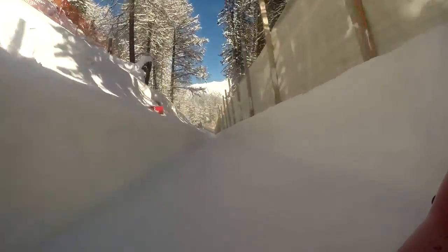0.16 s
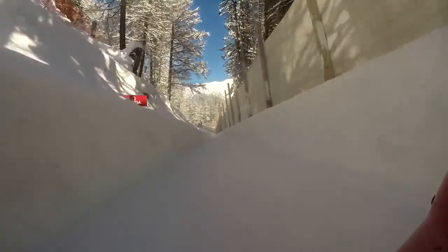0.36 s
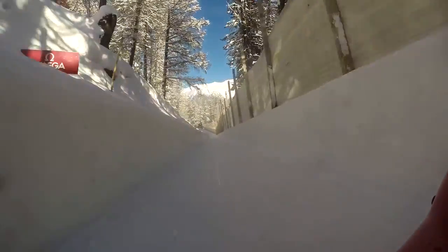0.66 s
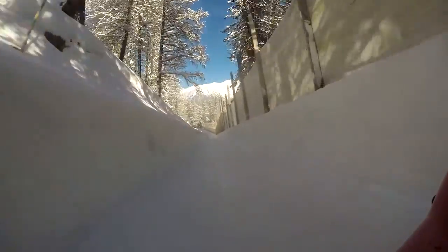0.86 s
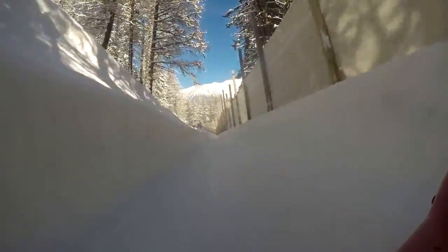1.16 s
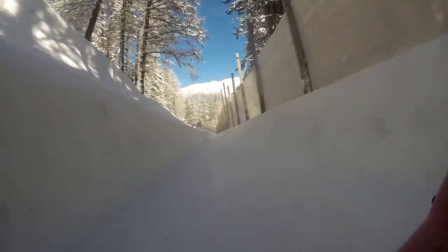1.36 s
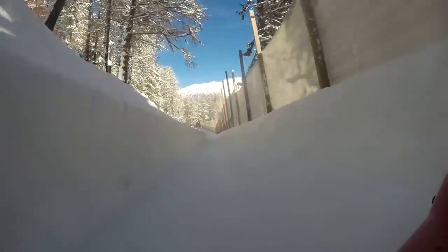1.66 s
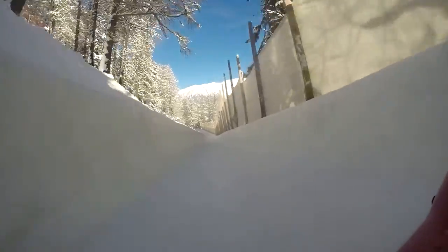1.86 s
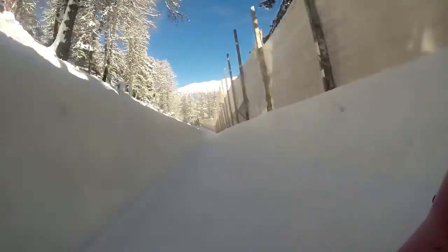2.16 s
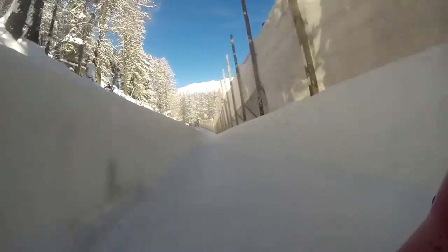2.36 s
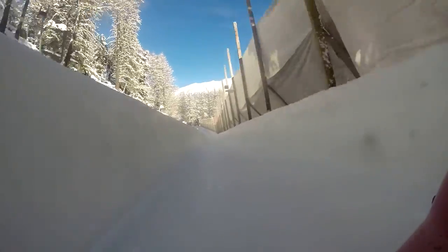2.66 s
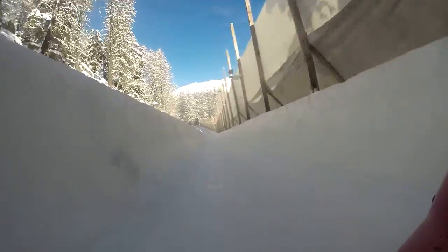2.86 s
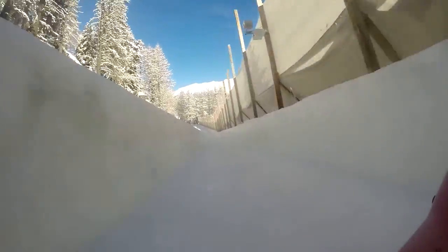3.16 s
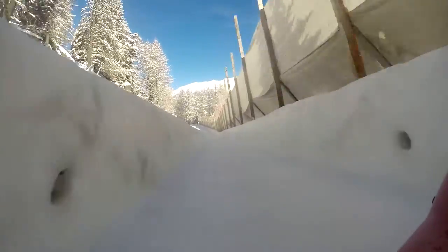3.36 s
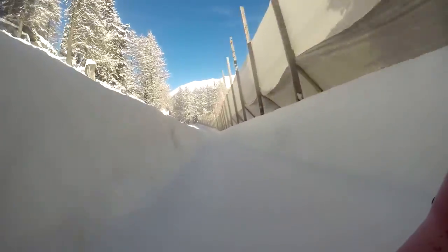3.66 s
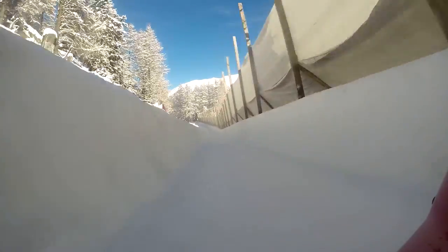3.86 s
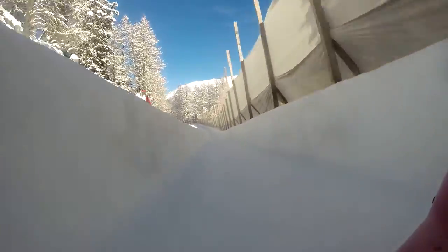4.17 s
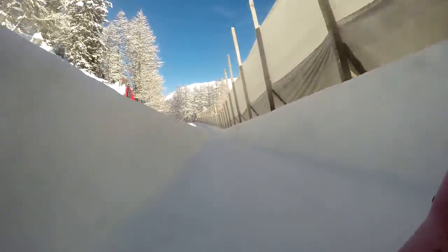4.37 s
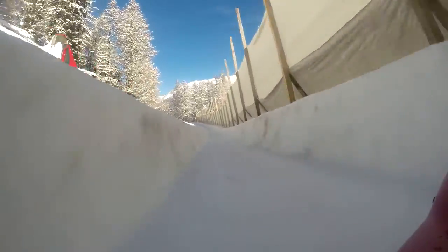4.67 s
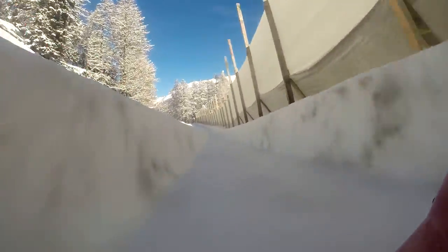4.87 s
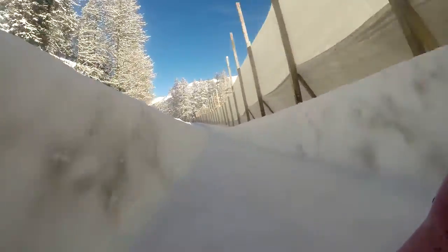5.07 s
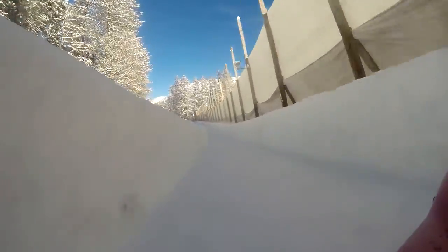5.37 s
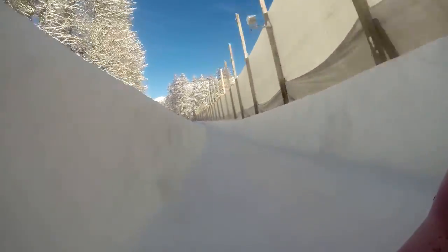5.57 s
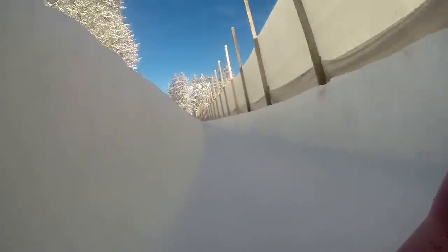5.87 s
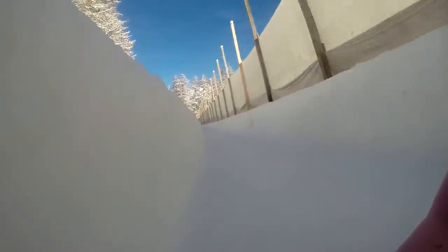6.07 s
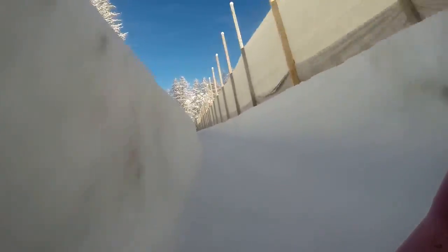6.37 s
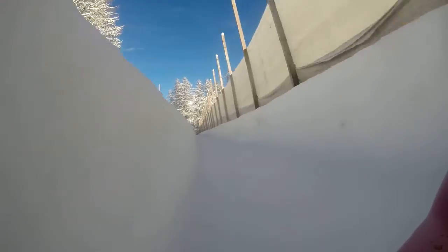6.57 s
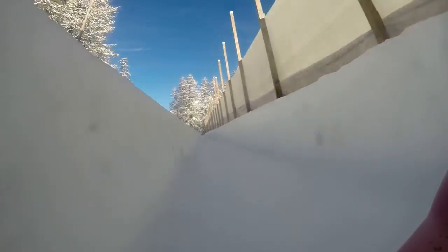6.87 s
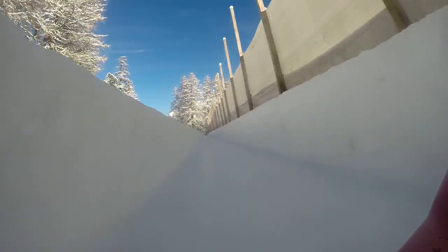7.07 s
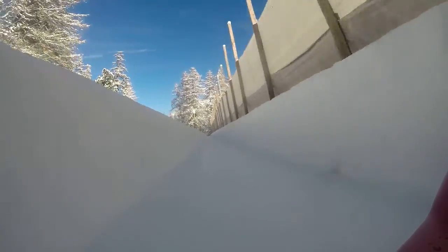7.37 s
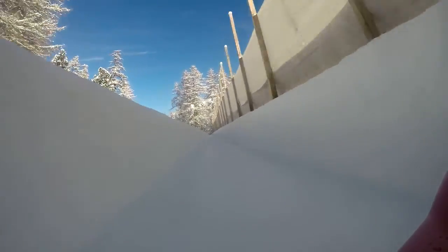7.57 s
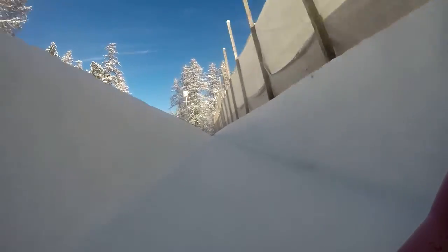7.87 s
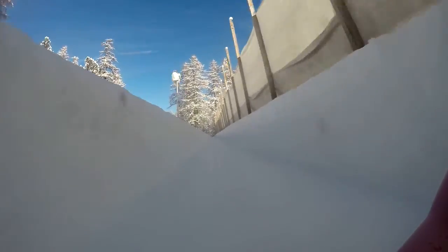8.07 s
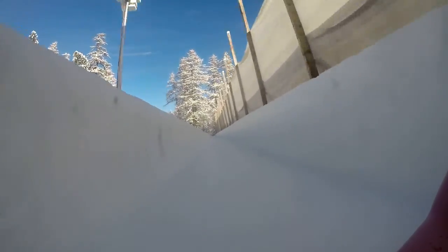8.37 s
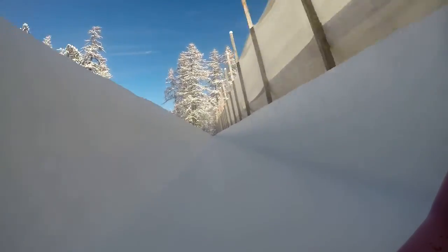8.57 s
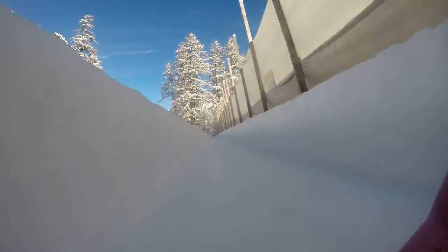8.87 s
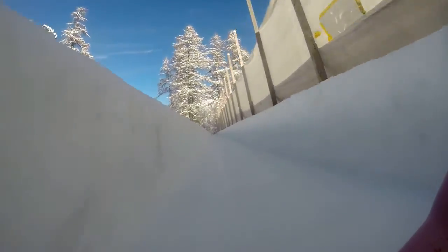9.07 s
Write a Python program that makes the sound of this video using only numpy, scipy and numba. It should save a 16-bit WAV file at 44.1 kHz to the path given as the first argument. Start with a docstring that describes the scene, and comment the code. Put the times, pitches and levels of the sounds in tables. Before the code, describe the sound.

A fast sled rattles down ice: dense irregular metallic knocking, deep humming vibration and grinding, with faint wind whistle growing towards the end.

```python
"""Low, wavering drones and a dense chatter of knocking steel, heard right at the source: the microphone
rides in a small camera clamped to a sled on an ice track. The frame and the cowling drone as wavering sines,
loose steel parts ring from bursts of noise, and a small part ticks about once per swing of the frame.
Behind them noise rumbles through the body resonances and wind whistles at the housing, louder towards the
end, over a faint hiss; two lone clicks are glitches in the signal, and the recorder holds its level down."""
import sys
import numpy as np
from scipy import signal
from scipy.io import wavfile
from scipy.ndimage import uniform_filter1d
from numba import njit

SR = 44100
rng = np.random.default_rng(int(sys.argv[2]) if len(sys.argv) > 2 else 0)


def transcribe(u):
    """Save the signal u as a 16-bit wav file named by the first command-line argument.

    u: samples, shape (n,) or (channels, n), limited to [-1, 1]; the rate is SR.
    q: integer samples, one column per channel.
    """
    v = np.clip(np.atleast_2d(u).T, -1, 1)
    q = np.round(v * 32767).astype(np.int16)
    wavfile.write(sys.argv[1], SR, q)


N = 406161


def undb(db):
    """Decibels to an amplitude factor."""
    return 10 ** (np.asarray(db) / 20)


def unit(x):
    """Scale a signal to an RMS of 1."""
    return x / np.sqrt(np.mean(x ** 2))


def curve(table):
    """Columns of a table joined by straight lines in time."""
    seconds, *columns = np.transpose(table)
    return [np.interp(np.arange(N) / SR, seconds, column) for column in columns]


def walk(rate):
    """Random levels held 1 / rate s and smoothed twice over that time; spread near 1."""
    hold = int(SR / rate)
    steps = np.repeat(rng.standard_normal(N // hold + 1), hold)
    slewed = uniform_filter1d(uniform_filter1d(steps, hold), hold)
    return 1.284 * slewed[:N]


@njit
def bandpass(x, hz, width):
    """State-variable band-pass, gain 1 at the centre."""
    y, band, low = np.empty(len(x)), 0., 0.
    g, k = np.tan(np.pi * hz / SR), width / hz
    for i in range(len(x)):
        v = (band + g * (x[i] - low)) / (1 + g * (g + k))
        band, low, y[i] = 2 * v - band, low + 2 * g * v, k * v
    return y


def ring(x, hz, width):
    """A resonance applied twice, for dark valleys on both sides."""
    stage_width = 1.7 * width  # each stage is wider than the pair
    once = bandpass(x, 1. * hz, stage_width)
    return bandpass(once, 1. * hz, stage_width)


def drone(hz, db, waver, rate, flutter_db):
    """A lightly damped mode kept going by rough ice, as a sine of wavering pitch and size; also its turns."""
    turns = np.cumsum(hz * (1 + waver * walk(rate))) / SR
    size = np.sqrt(2) * undb(db + flutter_db * walk(rate))
    return size * np.sin(2 * np.pi * turns), turns


# The frame's low swing, heard through the clamp. Each row: time in seconds, level in dB before swell and flutter.
FRAME_LEVEL = [(0.0, -20), (0.05, -15.5), (0.43, -28.5), (0.56, -14.5), (0.64, -31), (0.87, -16),
               (0.97, -26), (1.71, -19), (1.79, -21), (2.33, -26.5), (2.43, -19), (2.51, -28.5),
               (3.33, -16.5), (3.61, -34), (3.76, -17.5), (4.4, -21.5), (4.71, -13.5), (4.79, -29.5),
               (4.91, -15.5), (5.43, -40), (5.48, -18), (7.88, -20.5), (8.01, -36), (8.34, -19),
               (8.78, -28.5), (9.19, -12.5)]
FRAME_HZ = 41.18  # centre of the wavering pitch
FRAME_SWELL_DB, FRAME_SWELLS_PER_S = 2.5, 8.0


def frame_swing():
    """The frame's lowest mode; its turns of phase also pace the ticking part."""
    level_db = curve(FRAME_LEVEL)[0] + FRAME_SWELL_DB * walk(FRAME_SWELLS_PER_S)
    return drone(FRAME_HZ, level_db, waver=.04, rate=22, flutter_db=3.0)


# The cowling's drone above the frame. Each row: time in seconds, level in dB before swell and flutter.
COWLING_LEVEL = [(0.0, -21.5), (0.36, -25), (0.46, -15), (0.74, -17), (1.53, -15), (1.66, -24), (1.82, -7),
                 (1.87, -21.5), (2.02, -12.5), (2.1, -25), (2.15, -10.5), (2.22, -43.5), (2.25, -20),
                 (2.69, -22), (2.71, -13), (3.28, -23), (3.3, -35), (3.4, -13.5), (3.97, -17.5),
                 (4.02, -9.5), (4.07, -27), (4.15, -19), (5.48, -17.5), (5.61, -34), (5.71, -14),
                 (7.5, -21.5), (8.37, -16), (8.52, -29), (8.6, -14.5), (9.19, -19)]
COWLING_HZ, COWLING_WAVER = 172.9, .035  # centre pitch; quick waver as a share of it
COWLING_SWELL_DB, COWLING_SWELLS_PER_S, COWLING_FLUTTER_DB = 1.5, 22.0, 3


def cowling():
    """The cowling's main mode, quicker to waver than the frame."""
    level_db = curve(COWLING_LEVEL)[0] + COWLING_SWELL_DB * walk(COWLING_SWELLS_PER_S)
    drifting_hz = COWLING_HZ * (1 + 0.01982 * walk(11))
    return drone(drifting_hz, level_db, waver=COWLING_WAVER, rate=45, flutter_db=COWLING_FLUTTER_DB)[0]


# Loose steel parts close to the microphone, one row per mode. Each row: width in Hz of the narrower
# of its two filters, level in dB, share of a knock's brightness from 0 to 1.
STEEL_MODES = [(270, -9.5, 0), (141, -4.5, 0), (53.4, -18, 0.01), (154, -5.5, 0.15), (53, -6.5, 0.03),
               (45, -1, 0.08), (226, 1, 0.11), (35, -5, 0.08), (247, -5.5, 0.17), (83, -1.5, 0.17),
               (134, -6, 0.15), (222, -3.5, 0.22), (296, -5.5, 0.37), (150, -14.5, 1), (210, -1, 0.99),
               (200, 2.5, 0.96), (560, -12, 1), (120, -1, 1), (540, 0, 0.25), (3000, -8.5, 0.9)]
# Where those modes ring, in the same order. Each entry: frequency in Hz.
STEEL_MODE_HZ = [420, 650, 890, 1200, 1420, 1533, 1930, 2053, 2280, 2407, 2748, 3020, 3550, 4100, 4950,
                 5516, 6200, 7010, 1900, 11500]
# The chatter of one knock, in ms for a mode with no share of the brightness (shorter for the others).
ATTACK_MS, HOLD_MS, TAIL_MS, TAIL_SHARE = 0.78, 13.3, 26.3, 0.29


def steel(ice_db):
    """Each knock is a short chatter of contacts that holds, then dies; between them the ice keeps parts grinding."""
    push = np.zeros((len(STEEL_MODES), N + SR // 4))
    bright_share = np.array(STEEL_MODES)[:, 2]
    # only the first, hardest contacts reach the high modes, so time runs out sooner for them
    t_ms = np.arange(SR // 10) * 1000 / SR * (1 + .7 * bright_share[:, None])
    attack = 1 - np.exp(-t_ms / ATTACK_MS)
    decay = np.exp(-(t_ms / HOLD_MS) ** 2) + TAIL_SHARE * np.exp(-t_ms / TAIL_MS)
    chatter = attack * decay
    knocks = all_knocks()
    favour = rng.standard_normal((len(knocks), len(STEEL_MODES)))
    for (seconds, db, bright_db), mode_favour in zip(knocks, favour):
        i = int(seconds * SR)
        # every blow lands elsewhere and so favours other modes
        colour_db = bright_share * bright_db + 2.2 * mode_favour
        push[:, i:i + chatter.shape[1]] += undb(db + colour_db)[:, None] * chatter
    grind = undb(ice_db + 7.0 + 2.5 * walk(60))
    contacts = undb(2.5 * walk(300))
    out = 0
    for hz, (width, db, share), knock_push in zip(STEEL_MODE_HZ, STEEL_MODES, push):
        # narrow modes pass less noise, so they are raised
        gain = undb(db) * np.sqrt(SR / width / np.pi) / 5
        force = knock_push[:N] + grind * undb(-28 * share)  # grinding drives the high modes less
        drive = rng.standard_normal(N) * contacts * force
        ringing = bandpass(drive, 1. * hz, 1. * width)
        out = out + gain * bandpass(ringing, 1. * hz, 3.8 * width)
    # the closed housing lets little of the top through
    return signal.sosfilt(signal.butter(N=3, Wn=7400, fs=SR, output="sos"), out)


# The clear knocks. Each row: start in seconds, strength in dB, brightness in dB (how strongly it
# drives a mode with a full share of the brightness, compared with a mode that has none).
CLEAR_KNOCKS = [(0.0238, -9, -23.5), (0.377, -21.5, -47), (0.4302, -10.5, -38), (0.462, -10.5, -43),
                (0.5663, -10.5, -32), (0.5824, -7, -32), (0.6258, -7.5, -27), (0.6384, -8.5, -39),
                (0.6836, -6.5, -31), (0.7383, -10, -25), (0.7796, -7.5, -35), (0.8058, -15, -37),
                (0.841, -20, -42), (0.9015, -11.5, -49), (0.941, -6, -54), (1.118, -7, -45),
                (1.1917, -35, -32.5), (1.254, -8, -24), (1.3087, -6.5, -27), (1.3708, -11.5, -35),
                (1.484, -20, -43), (1.5248, -19, -23), (1.5374, -7.5, -27.5), (1.58, -9, -26),
                (1.664, -25, -35), (1.701, -32, -33.5), (1.7536, -26, -33), (1.8178, -38, -31),
                (1.8692, -23, -33), (1.935, -29, -28), (1.9544, -10.5, -39), (2.0143, -15, -35),
                (2.0574, -8, -26), (2.0948, -5.5, -32), (2.1227, -7.5, -30), (2.148, -10, -18),
                (2.172, -14.5, -22), (2.211, -9, -27), (2.229, -9, -38), (2.3955, -23, -12),
                (2.416, -17, -34), (2.456, -39, -36), (2.5571, -25, -32), (2.6698, -7, -43),
                (2.7197, -8, -32), (2.7322, -7, -34), (2.788, -15.5, -33), (2.842, -21, -26),
                (2.92, -8.5, -30), (2.94, -9.5, -43), (2.9677, -17.5, -20), (2.986, -9, -21),
                (3.016, -7.5, -36), (3.041, -19, -31), (3.067, -16, -38), (3.0834, -14.5, -38),
                (3.1368, -11, -37), (3.389, -9.5, -40), (3.465, -12, -36), (3.484, -9, -32),
                (3.5897, -33, -34), (3.608, -12, -32), (3.6391, -17, -25), (3.652, -22, -36),
                (3.706, -24, -34), (3.7349, -18, -33), (3.7996, -10.5, -33), (3.8456, -14, -27),
                (3.8906, -19, -32), (3.913, -7, -41), (3.934, -5, -45), (3.9685, -10.5, -28),
                (3.991, -3, -20), (4.039, -5.5, -24), (4.114, -26, -37), (4.1325, -7.5, -31),
                (4.1966, -8, -25), (4.2156, -18, -35), (4.259, -16.5, -29), (4.3959, -24, -35),
                (4.4087, -17.5, -41), (4.4288, -11.5, -46), (4.524, -18.5, -38), (4.5625, -9.5, -45),
                (4.598, -14, -43), (4.6843, -16.5, -31), (4.7002, -7, -42), (4.7238, -12, -36),
                (4.8723, -8, -25), (4.896, -10, -31), (4.923, -8, -40), (4.989, -26, -26),
                (5.0596, -19.5, -38), (5.0998, -18, -33), (5.1145, -7.5, -43), (5.2435, -17, -37),
                (5.3184, -13.5, -34), (5.3953, -9.5, -28), (5.4933, -15.5, -27), (5.5148, -4.5, -25),
                (5.5683, -8.5, -25), (5.6174, -2.5, -35), (5.683, -1, -27), (5.7273, -1, -35),
                (5.815, -10, -29), (5.916, -11.5, -21), (5.985, -17.5, -40), (6.0114, -15.5, -40),
                (6.0446, -14, -32), (6.082, -9, -33), (6.1275, -23, -31), (6.1415, -11.5, -33),
                (6.1818, -11, -24), (6.1993, -11, -29), (6.338, -16, -30), (6.3667, -10, -32),
                (6.4795, -32, -21), (6.5054, -4.5, -31), (6.5638, -9.5, -23), (6.7367, -11, -42),
                (6.7964, -8, -24), (6.8728, -18, -26), (6.8887, -15, -20), (6.94, -18.5, -26),
                (6.969, -7.5, -32), (6.999, -8, -29), (7.0514, -9, -38), (7.0922, -10, -39),
                (7.1177, -14.5, -34), (7.1524, -7.5, -24), (7.1876, -9, -32), (7.21, -5.5, -40),
                (7.2624, -5, -33), (7.3084, -10.5, -24), (7.368, -17, -32), (7.432, -9, -49),
                (7.4789, -26, -21.5), (7.5347, -9.5, -24), (7.5842, -15.5, -26), (7.636, -11.5, -40),
                (7.7688, -14, -28), (7.801, -24, -33), (7.872, -9, -36), (7.9564, -36, -22),
                (8.048, -17, -32), (8.105, -23, -23.5), (8.2043, -15, -29), (8.2203, -9, -34),
                (8.2786, -4.5, -19), (8.3744, -26, -27), (8.4522, -20, -25), (8.5445, -17, -22),
                (8.5992, -8.5, -37), (8.6564, -25.5, -19), (8.7026, -25, -27), (8.741, -8, -44),
                (8.81, -21, -22), (8.828, -28.5, -31), (8.9038, -15, -30), (8.972, -8, -21),
                (8.994, -2.5, -36), (9.0468, -11, -27), (9.0687, -7, -27), (9.1204, -7.5, -24),
                (9.183, -6.5, -35)]
# Small knocks at random times: level and brightness are means, FOLLOWS is dB per dB of roughness.
RATTLE_COUNT, RATTLE_DB, RATTLE_SPREAD_DB, RATTLE_BRIGHT_DB = 130, -30.5, 7, -34
RATTLE_FOLLOWS, RATTLE_JOLT_DB = 0.88, 3


def all_knocks():
    """Clear knocks and small ones, stronger on rough ice and while the parts still bounce from a clear knock."""
    at = rng.integers(0, N, RATTLE_COUNT)
    chance = rng.standard_normal((RATTLE_COUNT, 2))
    ice_lift_db = RATTLE_FOLLOWS * roughness()[at]
    bounce_lift_db = RATTLE_JOLT_DB * jolt()[at]
    db = RATTLE_DB + ice_lift_db + bounce_lift_db + RATTLE_SPREAD_DB * chance[:, 0]
    bright_db = RATTLE_BRIGHT_DB + 5.0 * chance[:, 1]
    return np.r_[CLEAR_KNOCKS, np.c_[at / SR, db, bright_db]]


JOLT_S = 0.054  # fade time constant in seconds, before the soft limit


def jolt():
    """Between 0 and about 1: how hard the sled has just been knocked, fading after each clear knock."""
    seconds, db, _ = np.transpose(CLEAR_KNOCKS)
    blows = np.zeros(N)
    blows[(seconds * SR).astype(int)] = undb(db - db.max())
    fade = np.exp(-1 / (JOLT_S * SR))
    return np.tanh(2 * signal.lfilter([1], [1, -fade], blows))


# Roughness of the ice under the runners. Each row: time in seconds, roughness in dB (steel adds its own offset).
ICE_ROUGHNESS = [(0.03, -39), (0.39, -38.5), (0.72, -31.5), (2.17, -29), (2.43, -40), (2.66, -30),
                 (2.86, -33), (3.17, -37), (3.42, -36.5), (3.88, -29.5), (4.39, -34), (5.67, -30),
                 (6.36, -30), (6.84, -27.5), (7.07, -29.5), (7.3, -34), (8.24, -32), (8.55, -35),
                 (8.98, -27.5), (9.19, -27)]


def roughness():
    """How much rougher than its average the ice is, in dB."""
    ice_db = curve(ICE_ROUGHNESS)[0]
    return ice_db - ice_db.mean()


# The small ticking part. Each row: resonance in Hz, nominal width in Hz, gain in dB.
TICKER_MODES = [(5470, 670, 35.5), (10500, 900, 32.5), (11900, 1100, 37)]
TICK_DB, TICK_FOLLOWS, TICK_WANDER_DB = -69, .6, -1.5  # middling ice; dB per dB of roughness; slow wander


def ticker(turns):
    """About one tiny tick for each swing of the frame, uneven in time and size, rung by high resonances."""
    uneven_turns = turns + .12 * walk(40)
    at = np.flatnonzero(np.diff(np.floor(uneven_turns)))
    ticks = np.zeros(N)
    ticks[at] = undb(4.5 * rng.standard_normal(N // 300)[:len(at)])
    level = undb(TICK_DB + TICK_FOLLOWS * roughness() + TICK_WANDER_DB * walk(6))
    return level * sum(undb(db) * ring(ticks, hz, width) for hz, width, db in TICKER_MODES)


# Body resonances under the runners. Each row: frequency in Hz, nominal width in Hz, relative level in dB.
BODY_MODES = [(28, 10, -12), (56.4, 23, -7), (74.4, 29.7, -0.5), (92.3, 17, -2), (115, 55, -1),
              (181.6, 36.7, 2), (211.4, 33, -8.5), (362.5, 100, -11.5), (537, 72, -12), (642.4, 43, -7.5),
              (739, 120, -10.5)]
# Level on ice of middling roughness, dB per dB of roughness, lift in dB from a full jolt.
RUMBLE_DB, RUMBLE_FOLLOWS, RUMBLE_JOLT_DB = -20.5, 0.68, 3.5


def rumble():
    """Ice roughness as noise through the body resonances: jolts shake them together and each flickers alone."""
    level_db = RUMBLE_DB + RUMBLE_FOLLOWS * roughness() + RUMBLE_JOLT_DB * jolt()
    shared_jolts_db = 2.77 * walk(12)
    out = 0
    for hz, width, db in BODY_MODES:
        flicker_db = 2.2 * walk(18)
        out = out + undb(db + flicker_db) * unit(ring(rng.standard_normal(N), hz, width))
    return undb(level_db + shared_jolts_db) * unit(out)


# Wind at the housing, growing with speed. Each row: time in seconds, whistle level in dB before its flutter.
WIND_LEVEL = [(0.1, -75), (0.7, -67), (1.53, -70.5), (5.65, -55), (5.87, -60), (8.11, -51), (8.95, -55),
              (9.15, -51.5)]


def wind():
    """Air past the housing as filtered noise: a breathy whistle over a broader rush and a faint high band."""
    whistle = unit(ring(rng.standard_normal(N), 6320, 310)) * undb(1.3 * walk(9.6))
    rush = unit(ring(rng.standard_normal(N), 5400, 1100)) * undb(-2.5)
    high = unit(ring(rng.standard_normal(N), 9900, 1600)) * undb(-20)
    return undb(curve(WIND_LEVEL)[0]) * (whistle + rush + high)


# Two lone sharp clicks, glitches in the signal. Each row: start in seconds, peak in dB before gain control.
LONE_CLICKS = [(1.2423, -23), (5.9174, -23)]


def clicks():
    """Glitches as single-sample impulses, with no ringing of their own."""
    out = np.zeros(N)
    for seconds, db in LONE_CLICKS:
        out[int(seconds * SR)] = undb(db)
    return out


def hiss():
    """A steady, faint band of high noise."""
    return undb(-79) * unit(ring(rng.standard_normal(N), 10500, 3500))


def scene():
    """The sled, the wind, the glitches and the hiss, as one channel."""
    frame, turns = frame_swing()
    sled = frame + cowling() + steel(curve(ICE_ROUGHNESS)[0]) + ticker(turns) + rumble()
    return (sled + wind() + clicks() + hiss())[None]


@njit
def hold_down(x, top, ratio, attack, release):
    """Gain control: follows the peaks and turns down what passes the top."""
    y, envelope = np.empty(len(x)), top
    for i in range(len(x)):
        size = abs(x[i])
        envelope += (size - envelope) * (attack if size > envelope else release)
        y[i] = x[i] * min(1., top / envelope) ** (1 - 1 / ratio)
    return y


TOP_HZ = 14600  # upper edge of the recorder's band


def record(dry):
    """The recorder: gain control on the peaks, a soft ceiling and the top cut."""
    # attack and release are the share of the gap closed per sample
    held = hold_down(dry[0], top=0.4, ratio=10.0, attack=0.0082, release=0.000077)
    soft = 1.064 * np.tanh(held / 0.91)
    top_cut = signal.ellip(8, .2, 70, TOP_HZ, fs=SR, output="sos")
    return signal.sosfilt(top_cut, soft)[None]


dry = scene()
out = record(dry)
transcribe(out)
```